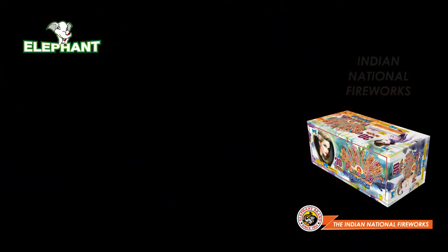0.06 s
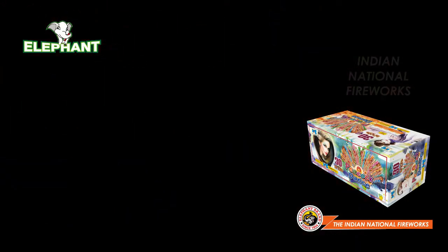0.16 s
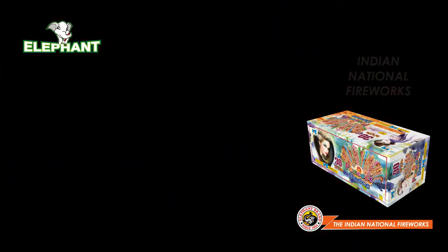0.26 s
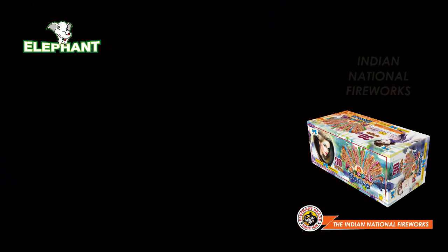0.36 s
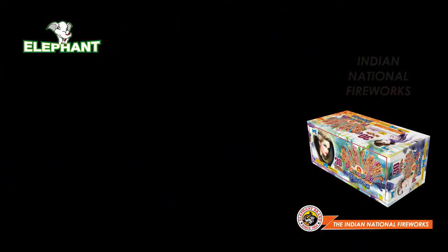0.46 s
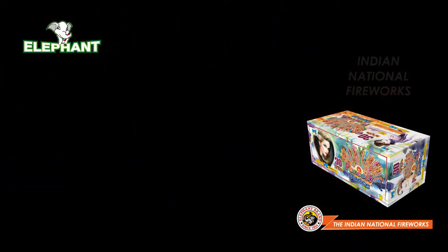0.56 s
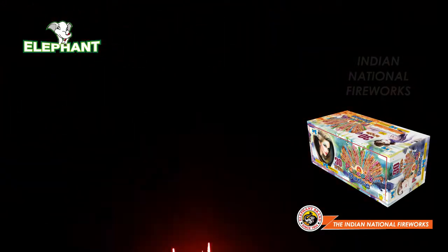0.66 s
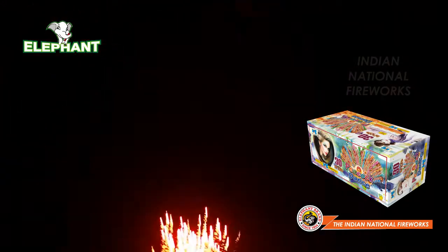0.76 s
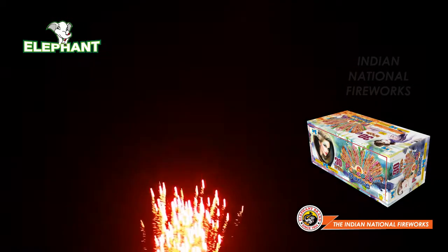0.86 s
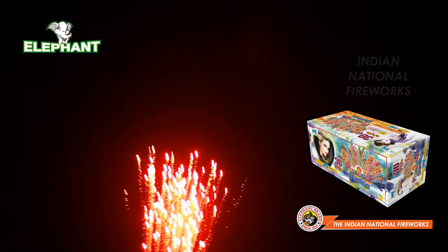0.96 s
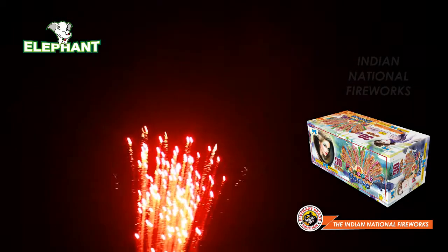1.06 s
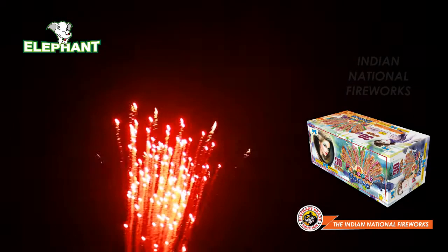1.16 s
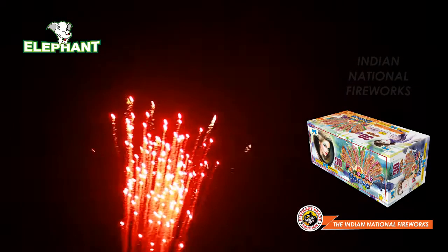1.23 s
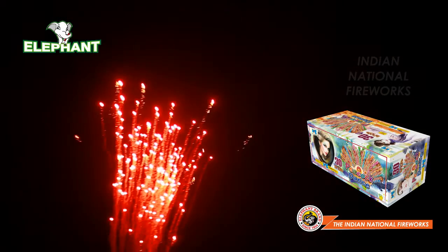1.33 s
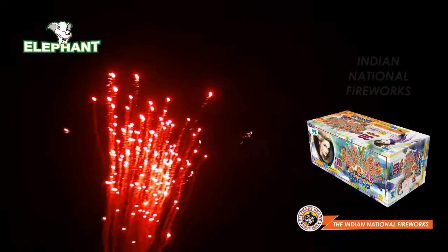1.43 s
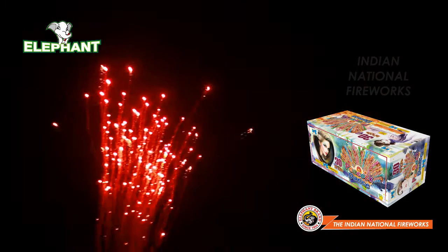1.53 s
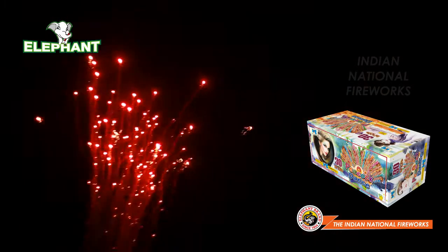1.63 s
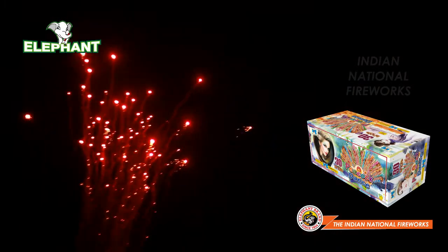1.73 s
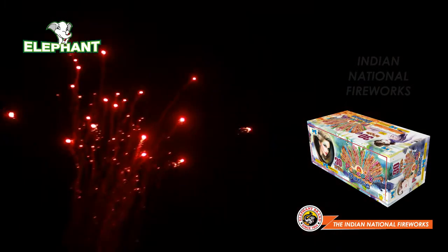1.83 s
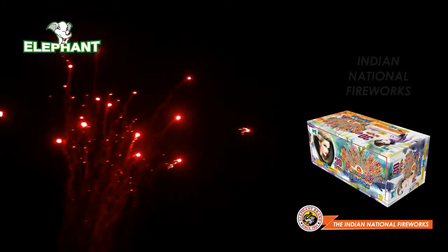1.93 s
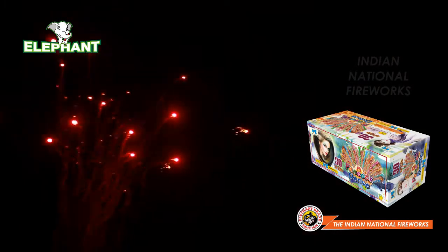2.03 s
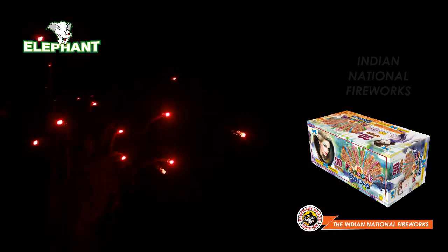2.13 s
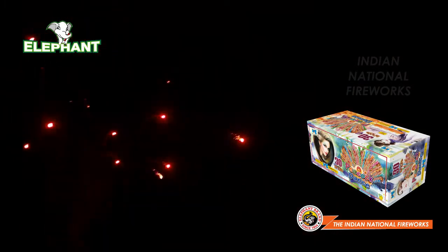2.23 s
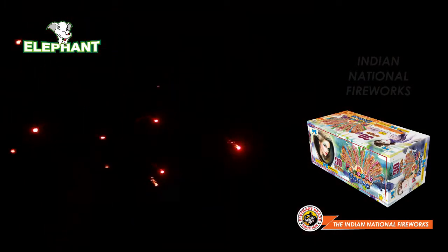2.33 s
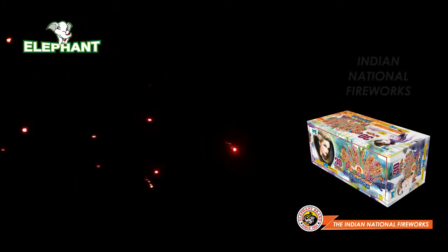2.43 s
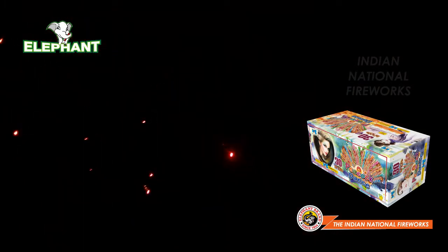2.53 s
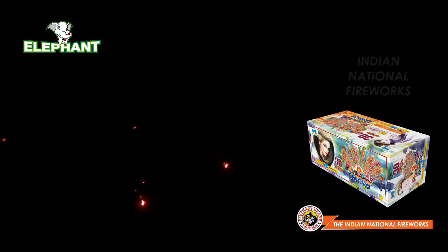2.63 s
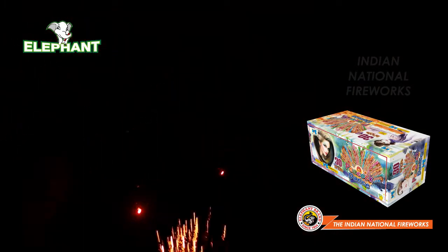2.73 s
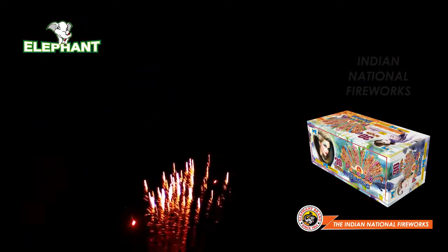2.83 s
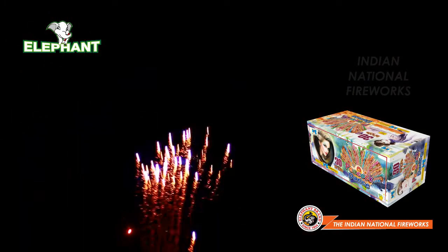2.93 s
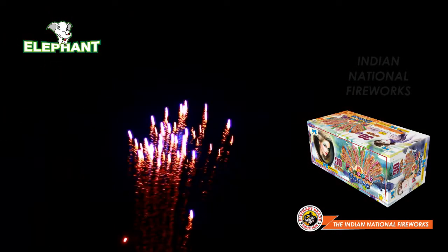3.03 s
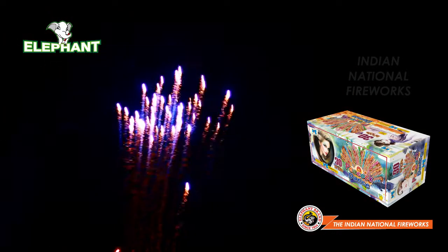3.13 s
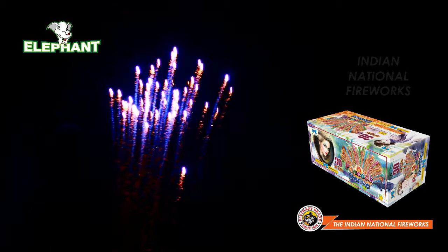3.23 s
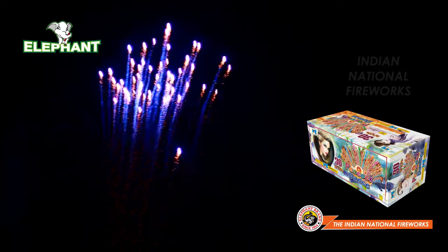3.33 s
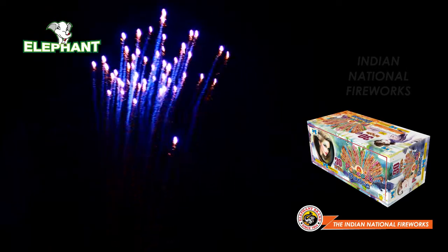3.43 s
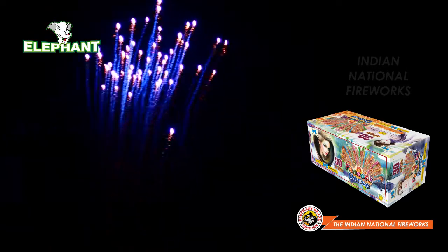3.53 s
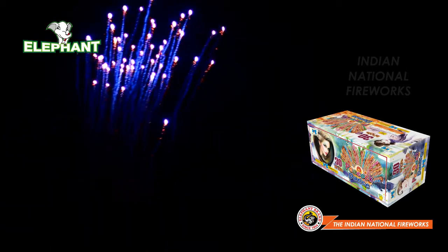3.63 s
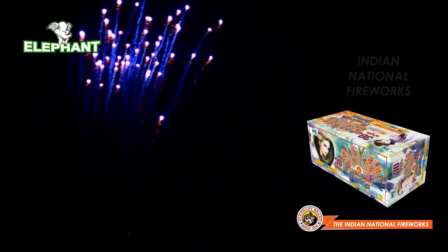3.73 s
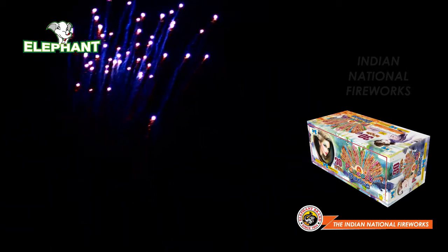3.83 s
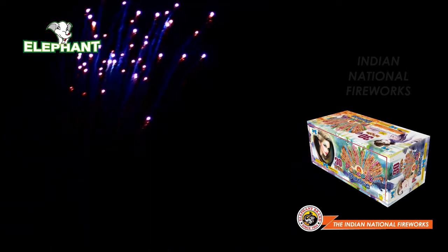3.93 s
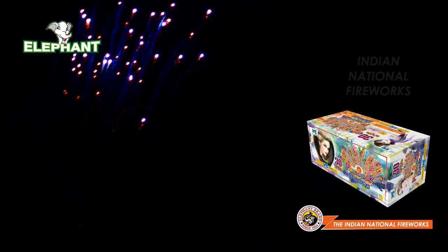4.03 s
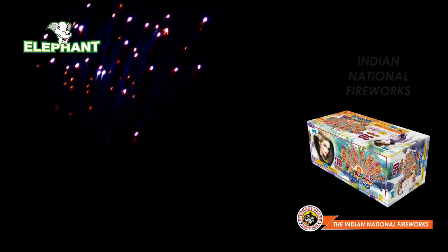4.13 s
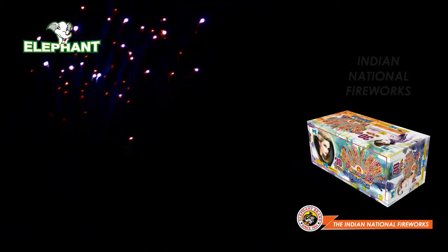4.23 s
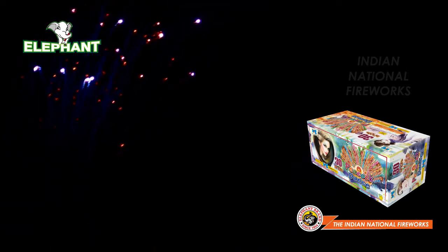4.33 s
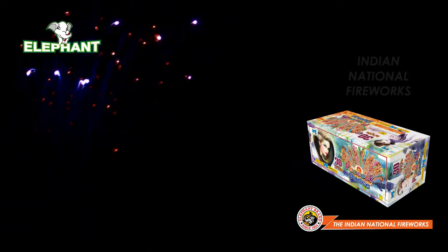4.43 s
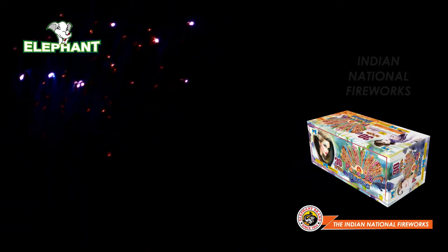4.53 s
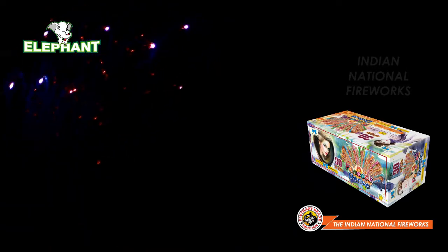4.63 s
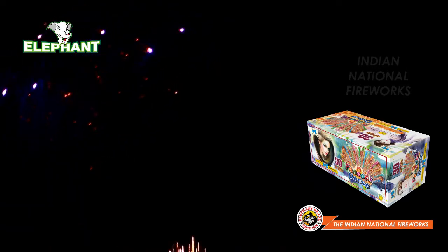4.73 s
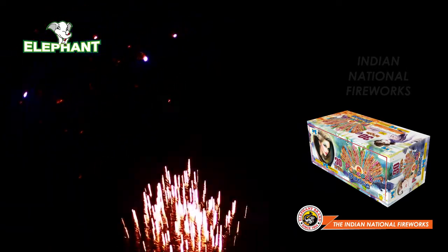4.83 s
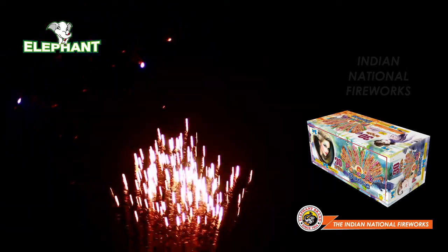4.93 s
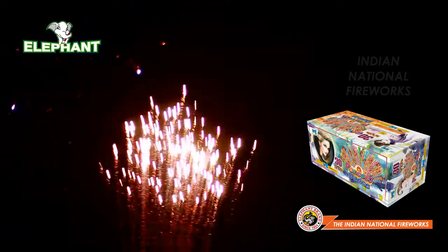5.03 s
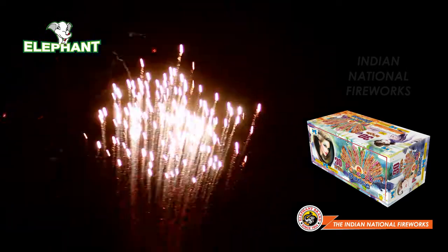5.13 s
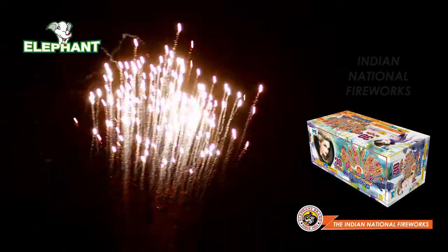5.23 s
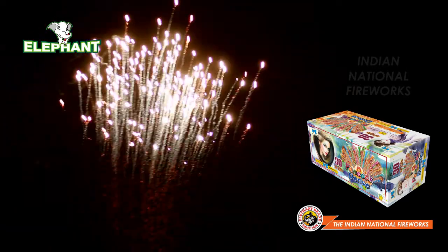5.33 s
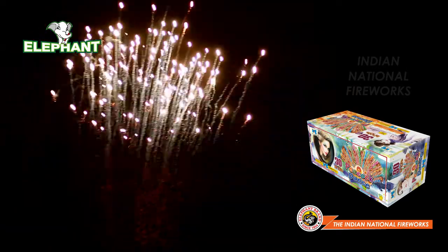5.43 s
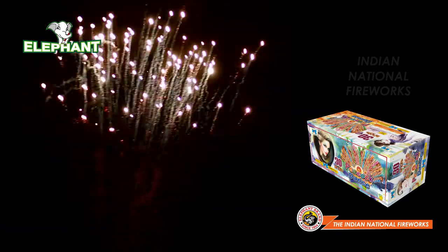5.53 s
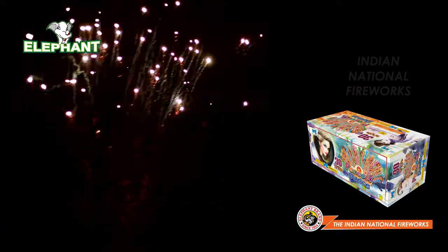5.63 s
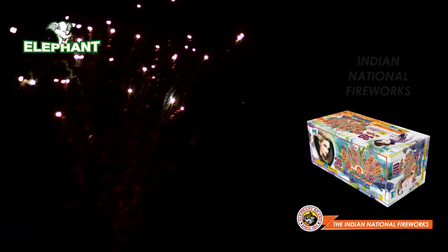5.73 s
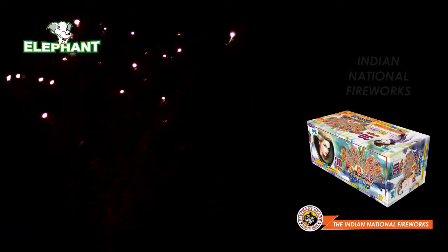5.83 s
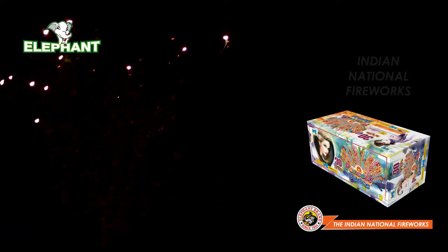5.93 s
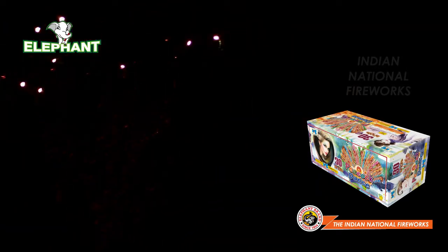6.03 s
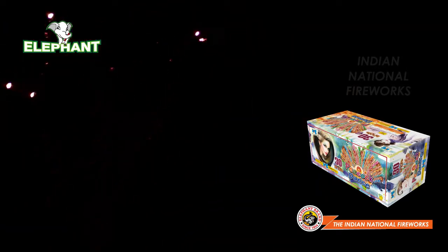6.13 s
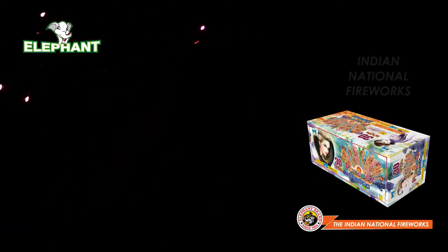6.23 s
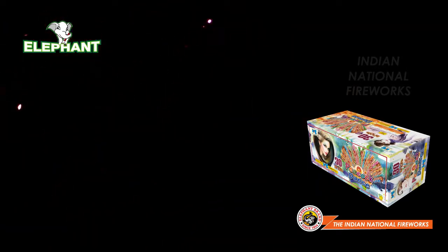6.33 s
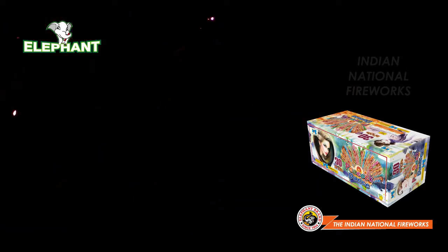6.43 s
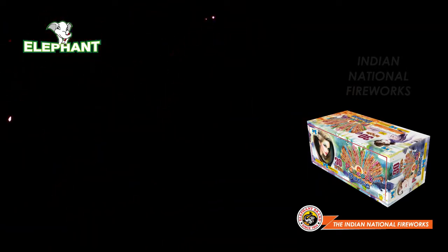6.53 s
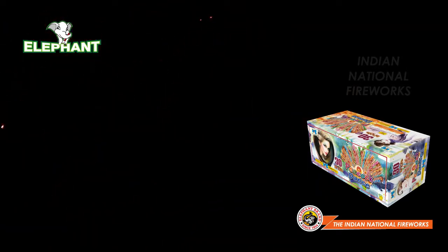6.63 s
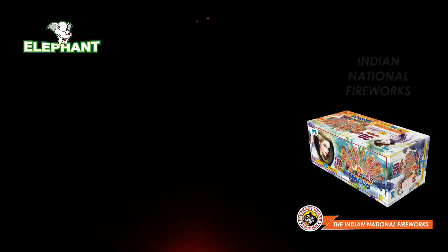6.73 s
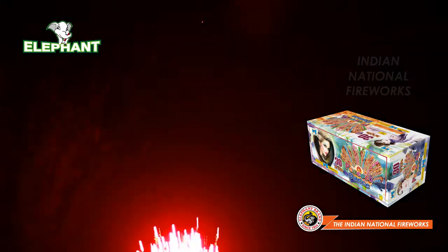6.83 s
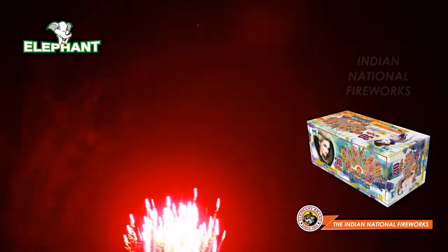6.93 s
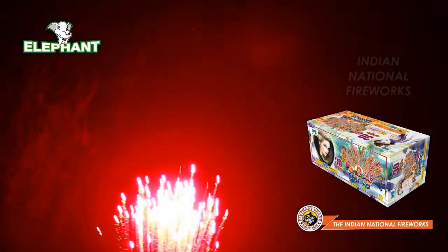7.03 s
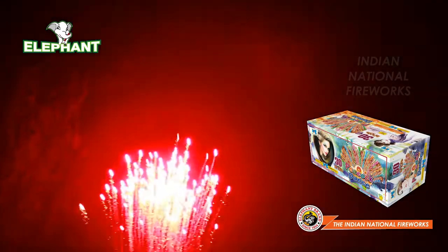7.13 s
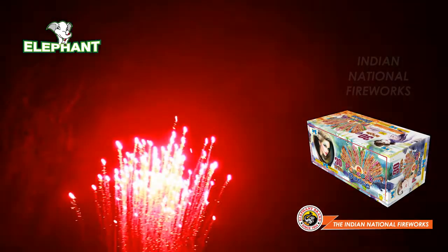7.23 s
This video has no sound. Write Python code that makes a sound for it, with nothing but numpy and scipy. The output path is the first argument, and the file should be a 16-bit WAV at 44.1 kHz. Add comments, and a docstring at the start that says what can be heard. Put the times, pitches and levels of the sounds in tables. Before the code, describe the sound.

In a cricket-filled field at night, a close fireworks cake cracks four times, overloading the microphone, burning stars hissing afterwards while far explosions thump.

```python
"""A fireworks cake fires four salvos of comets in a field at night, close enough to overload the microphone.
Each bang sums a noise crack, ringing tubes and box, a boom and a thump; a slap echo, scatter from ground
and trees, and a rolling tail follow it. Burning stars hiss as three bands of noise and pop in short bursts.
Other fireworks thud far off as damped low tones over a rumble. Crickets sing throughout as gliding tones,
and a katydid rasps once in a burst of noise."""
import sys
import numpy as np
from scipy import signal
from scipy.fft import rfft, irfft, next_fast_len
from scipy.io import wavfile

SR = 44100
rng = np.random.default_rng(int(sys.argv[2]) if len(sys.argv) > 2 else 0)


def log_audio(samples):
    """Write samples as a 16-bit WAV file to the path given in sys.argv[1]."""
    # one column per channel
    frames = np.atleast_2d(samples).T
    # limit to full scale, then quantise
    limited = np.clip(frames, -1, 1)
    pcm = np.round(limited * 32767).astype(np.int16)
    wavfile.write(sys.argv[1], SR, pcm)


N = 320607
TIME = np.arange(N) / SR  # s

# The salvos. Each row: start in seconds, crack level in dB, crack rise in seconds, tube pitch in Hz, tube level
# in dB, boom pitch in Hz, boom level in dB, boom delay in seconds, ground thump level in dB, echo delay in
# seconds, echo level in dB, relative scatter from ground and foliage in dB, rolling tail level in dB.
SALVOS = [(0.5402, -2.5, 0.0022, 641, 5.5, 309, 0.5, .0040, -4.5, 0.058, -19.5, 0, -29.5),
          (2.5214, -3, 0.0037, 905, 2.5, 285, 3.5, .0046, -9, 0.06, -18.5, -0.5, -25.5),
          (4.6532, 7.5, 0.0018, 1240, 5.5, 262.5, 15, 0.00316, -29, .0610, -17.5, 4.5, -18),
          (6.6300, 2, 0.0018, 647, 6.5, 234, 10, 0.0025, -11, 0.062, -18, -0.5, -21.5)]
# Hard surfaces near the cake. Each row: delay in seconds, level in dB.
BOUNCES = [(.0031, -13), (0.0103, -17.5), (0.0162, -22)]
# The cardboard box that holds the tubes, as resonances. Each row: pitch in Hz, relative level in dB.
BOX_MODES = [(380, -1), (500, 1.5), (650, -2), (890, -3), (1270, -3), (1540, -3.5), (2190, -3.5)]
# Spectra of the crack and of what ground, foliage and field return.
# Each row: frequency in Hz, relative density in dB per Hz.
CRACK_SPECTRUM = [(30, -0.5), (150, 3), (600, 1.5), (1400, -7), (2200, -8.5), (4000, -11.5), (9000, -15.5),
                  (16000, -27)]
GROUND_SPECTRUM = [(30, -10), (110, -5.5), (230, 1), (400, 3), (600, -3.5), (1000, -9), (2200, -21),
                   (5000, -25.5), (10000, -25.5), (16000, -43)]
FOLIAGE_SPECTRUM = [(100, -9), (350, 2.5), (1000, -5.5), (2000, -3), (3200, -2), (5000, -4), (9000, -8),
                    (12000, -16), (16000, -29.5)]
ROLL_SPECTRUM = [(30, -20.5), (100, -9.5), (270, 3.5), (430, -4), (800, -13), (2000, -17), (5000, -23),
                 (10000, -33.5), (16000, -43)]
GROUND_DB, FOLIAGE_DB = -14, -23  # before each salvo's own scatter level

# The burning stars of each salvo. Each row: catch in seconds, time to full flame in seconds, time at full flame
# in seconds, fade in dB per second, roar level at the catch in dB, hiss level in dB, fizz level in dB.
STARS = [(.6, 0.16, 0.41, 16.5, -45.5, -42.5, -45.5), (2.66, 0.53, 0.34, 18, -47, -57.5, -67.5),
         (4.85, 0.31, 0.33, 23.5, -45.5, -47, -53.5), (6.7, 0.25, .45, 22, -43, -43, -47.5)]
# Spectra of the three parts of the flame. Each row: frequency in Hz, relative density in dB per Hz.
ROAR_SPECTRUM = [(100, -20.5), (300, -4), (520, 0), (900, -1), (1300, -0.5), (2300, -3), (3500, -10),
                 (7000, -35.5)]
HISS_SPECTRUM = [(1200, -26.5), (2700, -3.5), (4000, -2.5), (6500, -2), (8500, -3.5), (11000, -18),
                 (16000, -33)]
FIZZ_SPECTRUM = [(6000, -27), (9000, -6.5), (10500, 0), (12500, -2), (15000, -7), (16500, -13)]
ROAR_SINK_DB_PER_S = 5  # the roar dies sooner than the hiss as the stars slow down

# Stars that pop overhead. Each row: start in seconds, relative level in dB, pitch of the ringing band in Hz,
# ring against snap in dB.
POPS = [(0.7008, -29.5, 2150, 3.5), (1.16, -28, 562, -8), (2.316, -49, 2240, 9.5), (3.114, -39, 1580, -2),
        (3.1450, -30, 1235, -0.5), (4.716, -19.5, 3150, 13.5), (4.7273, -19.5, 3130, 11),
        (4.8139, -26.5, 2480, 0), (5.1032, -31.5, 2660, -3), (5.2441, -29, 2730, -3),
        (5.2745, -20.5, 5300, -7.5)]
# Spectrum of their snap. Each row: frequency in Hz, relative density in dB per Hz.
POP_SPECTRUM = [(100, 2), (500, 4), (1400, -2.5), (3000, -1.5), (5500, -14), (7000, -16), (16000, -45)]

# Far fireworks. Each row: start in seconds, relative level in dB, pitch in Hz.
THUDS = [(0.107, -39, 139), (0.183, -29, 249), (0.22, -32, 150), (0.32, -28.5, 250), (0.378, -31.5, 148),
         (.451, -31, 195), (1.842, -36.5, 129), (1.99, -37.5, 150), (2.954, -32, 128), (2.978, -32.5, 129),
         (3.018, -27, 195), (4.471, -36.5, 147.4), (5.154, -29.5, 213), (5.456, -21.5, 148),
         (6.058, -24, 129), (6.099, -24.5, 170), (6.134, -22.5, 223), (6.189, -34, 169), (6.508, -21, 197),
         (6.566, -21, 150)]
# Underlying rumble, before reports add to it. Each row: time in seconds, level in dB.
RUMBLE_LEVEL = [(0, -54.5), (1.9, -60), (2.4, -62), (3.6, -64), (4.4, -55), (5.3, -45), (6.05, -43.5),
                (6.35, -52.5), (6.8, -36.5), (7.26, -43.5)]
# Spectra of the rumble and of the air. Each row: frequency in Hz, relative density in dB per Hz.
RUMBLE_SPECTRUM = [(15, -10), (40, -4), (80, 4.5), (140, 0.5), (260, -5), (450, -16), (900, -35.5),
                   (3000, -57.5)]
AIR_SPECTRUM = [(30, -0.5), (300, -1.5), (800, -4.5), (2000, -8), (5000, -13), (9000, -15), (12000, -19.5),
                (16000, -21)]
# The rumble that swells and dies after a listed thud or a salvo: level, and seconds to its peak.
THUD_RUMBLE_DB, THUD_RUMBLE_S = -22.5, .05  # dB relative to the thud's listed level
SALVO_RUMBLE_DB, SALVO_RUMBLE_S = -50, 0.15

# Two trilling crickets. Each row: wing strokes per second, mean start pitch in Hz, end pitch in Hz,
# stroke length in seconds, relative level in dB.
TRILLS = [(45.9, 9200, 7550, 0.0057, -56), (40.5, 8650, 6950, 0.0091, -56)]
# Gain of the trills and the chorus. Each row: time in seconds, gain in dB.
TRILL_EFFORT = [(0, 2.5), (2, 3), (3.4, 2.5), (4.3, 2.5), (6, 0.5), (6.6, 7.5)]
# A third cricket that chirps in pairs of strokes. Each row: start in seconds, level in dB.
CHIRPS = [(5.875, -55.5), (5.974, -52.5), (6.078, -50.5), (6.18, -48.5)]
# Spectrum of the katydid's rasp. Each row: frequency in Hz, relative density in dB per Hz.
RASP_SPECTRUM = [(3000, -71.5), (6100, -43.5), (6700, -13), (7400, -8.5), (8500, -1), (9700, -3),
                 (10800, -15), (12500, -24), (13500, -42), (16000, -59)]

EDGE_HZ = 15900  # upper band limit


def amp(db):
    """Decibels are logarithmic: 20 dB is a tenfold amplitude."""
    return 10 ** (np.asarray(db) / 20)


def evened(x):
    """Normalisation: scales to rms 1."""
    return x / np.sqrt(np.mean(x ** 2) + 1e-20)


def add(mix, s, sound):
    """Superposition: sums a sound into the mix at time s."""
    part = mix[max(round(s * SR), 0):][:len(sound)]
    part += sound[:len(part)]


def colour(x, points):
    """Spectral filtering: weights x by frequency, at rms 1."""
    hz, db = np.transpose(points)
    bins = np.fft.rfftfreq(len(x), 1 / SR)
    gain = amp(np.interp(np.log(bins + 1), np.log(hz), db))
    return evened(irfft(rfft(x) * gain, len(x)))


def noise(points, size=N):
    """Filtered Gaussian noise: white noise coloured at rms 1, then cut to size."""
    return colour(rng.standard_normal(next_fast_len(size)), points)[:size]


def scatter(points, size, grain_db=2.0):
    """Diffuse scattering: countless small contributions of unequal strength."""
    strength_db = grain_db * np.minimum(rng.exponential(1, size), 3)
    return colour(rng.standard_normal(size) * amp(strength_db), points)


def wander(per_s, size=N):
    """Slow random modulation: straight lines between per_s random knots a second, at rms 1."""
    knots = rng.standard_normal(size // 30)
    return evened(np.interp(np.arange(size) * per_s / SR, np.arange(len(knots)), knots))


def swell(t, peak_s):
    """Critically damped response: rises to 1 at peak_s, then dies away."""
    u = np.maximum(t, 0) / peak_s
    return u * np.exp(1 - u)


def ring(t, hz, peak_s):
    """Damped resonance of a struck body of air; push and suction cancel."""
    envelope = swell(t, peak_s)
    push = envelope * np.sin(2 * np.pi * hz * t)
    return push - envelope * push.sum() / envelope.sum()


def stroke(start_hz, end_hz, length):
    """Stridulation: the pitch falls as the scraper slows along the file."""
    hz = np.linspace(start_hz, end_hz, int(length * SR))
    phase = 2 * np.pi * np.cumsum(hz) / SR
    return np.sin(phase) * signal.windows.hann(len(hz)) ** .5


def trills():
    """Periodic stridulation: regular strokes, each slightly uneven in time, level and starting pitch."""
    out = np.zeros(N)
    for rate, start_hz, end_hz, length, db in TRILLS:
        for s in np.arange(0, TIME[-1], 1 / rate):
            late, loud, sharp = rng.standard_normal(3)
            sound = stroke(start_hz + 70 * sharp, end_hz, length)
            add(out, s + 0.00094 * late, amp(db + loud) * sound)
    return out


def katydid(level_db=-36, centre_s=3.877, rise_s=0.019, fall_s=0.022):
    """Stridulation as a noise burst: the wings scrape once, loud and near."""
    width = np.where(TIME < centre_s, rise_s, fall_s)
    shape = 1 / (1 + np.abs((TIME - centre_s) / width) ** 4)
    return amp(level_db) * noise(RASP_SPECTRUM) * amp(2.4 * wander(400)) * shape


def insects(chorus_db=-70):
    """Incoherent sum of many singers: two trills over a far chorus, paired chirps and one rasp."""
    chorus = noise([(5000, -40.5), (6800, -10.5), (7500, -1.5), (8400, -4.0), (9200, -14.0), (12000, -48)])
    out = amp(chorus_db) * chorus + trills()
    out *= amp(np.interp(TIME, *np.transpose(TRILL_EFFORT)))
    for s, db in CHIRPS:
        for gap in (0, .022):
            add(out, s + gap, amp(db) * stroke(5600, 4950, .015))
    return out + katydid()


def rumble(lumpy_db=3.0):
    """Incoherent sources add in power: a lumpy low rumble, fed by the listed thuds and the salvos."""
    power = amp(np.interp(TIME, *np.transpose(RUMBLE_LEVEL))) ** 2
    t = np.arange(SR) / SR
    for s, db, _ in THUDS:
        add(power, s, (amp(db + THUD_RUMBLE_DB) * swell(t, THUD_RUMBLE_S)) ** 2)
    for s, *_ in SALVOS:
        add(power, s, (amp(SALVO_RUMBLE_DB) * swell(t, SALVO_RUMBLE_S)) ** 2)
    return noise(RUMBLE_SPECTRUM) * np.sqrt(power) * amp(lumpy_db * np.tanh(wander(25)))


def thuds_everywhere(per_s=1.5, mean_db=-42, spread_db=3.5, pitch_hz=140):
    """Random independent events: the loud thuds, and fainter ones strewn among them."""
    chance = rng.random((60, 4))
    faint = []
    for s, loud, high, keep in chance:
        if keep < per_s * TIME[-1] / len(chance):  # leaves about per_s a second
            db = mean_db + spread_db * (2 * loud - 1)
            faint.append((s * TIME[-1], db, pitch_hz * 2 ** (high - .5)))
    return list(THUDS) + faint


def far_fireworks(thud_db=-1.0, smear=0.21, smear_s=0.022):
    """Distance acts as a low-pass filter: only dull thuds remain, each smeared by noise."""
    out, t = np.zeros(N), np.arange(SR // 10) / SR
    for s, db, hz in thuds_everywhere():
        low_smear = smear * noise(RUMBLE_SPECTRUM, size=len(t)) * swell(t, smear_s)
        knock = 0.076 * noise(GROUND_SPECTRUM, size=len(t)) * swell(t, 0.0021)
        thud = ring(t, hz, peak_s=0.48 / hz)
        add(out, s, amp(db + thud_db) * (thud + low_smear + knock))
    return out


def pops(level_db=-9):
    """Impulsive radiation: each small report is a broad snap and a ringing band under one short envelope."""
    out, t = np.zeros(N), np.arange(SR // 8) / SR
    for s, db, hz, ring_db in POPS:
        # the point order matters to the interpolation
        points = [(hz / 2, -40), (hz / 0.92, -12), (hz, 0), (hz * 0.9, -12), (hz * 2, -40), (SR, -70)]
        body = noise(points, size=len(t))
        snap = noise(POP_SPECTRUM, size=len(t))
        add(out, s, amp(db + level_db) * swell(t, 0.0037) * (snap + amp(ring_db) * body))
    return out


def stars(flutter_db=0.55):
    """Combustion noise: the comets catch, burn with a dense spitting hiss, and fade as they climb."""
    out, t = np.zeros(N), np.arange(3 * SR) / SR
    for s, rise_s, hold_s, fade_db_per_s, roar_db, hiss_db, fizz_db in STARS:
        faded_db = fade_db_per_s * np.maximum(t - rise_s - hold_s, 0)
        flutter = flutter_db * wander(90, size=len(t))
        burning = np.minimum(t / rise_s, 1) * amp(flutter - faded_db)
        sinking_db = roar_db - ROAR_SINK_DB_PER_S * t
        for spectrum, db in [(ROAR_SPECTRUM, sinking_db), (HISS_SPECTRUM, hiss_db), (FIZZ_SPECTRUM, fizz_db)]:
            add(out, s, burning * amp(db) * scatter(spectrum, size=len(t), grain_db=1.0))
    return out


def ground(t, t60=0.2, rise_s=0.002, patchy_db=2.0):
    """Diffuse reflection from the ground and things nearby, decaying 60 dB in t60 seconds."""
    level_db = -60 * t / t60 + patchy_db * wander(200, size=len(t))
    return scatter(GROUND_SPECTRUM, size=len(t)) * (1 - np.exp(-t / rise_s)) * amp(level_db)


def foliage(t, delay, rise_s=0.013, fall_s=0.033, patchy_db=2.5, second_path_s=.0032, second_path=0.18):
    """Scattering and comb filtering: leaves return a bright splash, made hollow by a second, longer path."""
    shape = np.exp(np.minimum((t - delay) / rise_s, (delay - t) / fall_s))  # peaks at delay
    patches = amp(patchy_db * wander(220, size=len(t)))
    splash = scatter(FOLIAGE_SPECTRUM, size=len(t), grain_db=3.0) * shape * patches
    return splash + second_path * np.interp(t - second_path_s, t, splash)


def roll(t, t60=0.79, far_s=0.264, far_width_s=0.041, far_db=5.5, patchy_db=2.0, count=4):
    """Reverberation: the bang rolls across the field and swells once off distant walls; bands flutter apart."""
    level_db = -60 * t / t60 + far_db * np.exp(-((t - far_s) / far_width_s) ** 2)
    spectrum = rfft(scatter(ROLL_SPECTRUM, size=len(t)))
    band = np.searchsorted([500, 1500, 4000], np.fft.rfftfreq(len(t), 1 / SR))  # edges in Hz
    rolling = np.zeros(len(t))
    for k in range(count):
        flutter = amp(patchy_db * wander(150, size=len(t)))
        rolling += irfft(spectrum * (band == k), len(t)) * flutter
    return rolling * (1 - np.exp(-t / 0.051)) * amp(level_db)


def blast(t, crack_db, crack_s, tube_hz, tube_db, boom_hz, boom_db, boom_s, thump_db, box_db=-7, ragged_db=-2.0):
    """Explosive radiation: gas tears out, tubes and box ring, the expanding cloud booms, the recoil thumps."""
    ragged = amp(crack_db + ragged_db * wander(720, size=len(t)))
    crack = ragged * noise(CRACK_SPECTRUM, size=len(t)) * swell(t, crack_s) ** 2
    bounced = sum(amp(db) * np.interp(t - late, t, crack) for late, db in BOUNCES)
    tubes = amp(tube_db) * ring(t - .0005, tube_hz, peak_s=0.0022)
    box = sum(amp(box_db + db) * ring(t - .001, hz, peak_s=0.0025) for hz, db in BOX_MODES)
    boom = amp(boom_db) * ring(t - boom_s, boom_hz, peak_s=0.0015)
    thump = amp(thump_db) * ring(t - .001, 110, peak_s=0.0027)
    return crack + bounced + tubes + box + boom + thump


def salvos():
    """Direct sound, early reflection and reverberation: each blast with its slap echo, scatter and tail."""
    out, t = np.zeros(N), np.arange(SR * 4 // 5) / SR
    brief, near = t[:SR // 20], t[:SR // 3]
    for s, *charge, delay, echo_db, scatter_db, tail_db in SALVOS:
        bang = blast(brief, *charge)
        add(out, s, bang)
        add(out, s + delay, amp(echo_db) * bang)
        scattered = amp(GROUND_DB) * ground(near) + amp(FOLIAGE_DB) * foliage(near, delay + 0.002)
        add(out, s, amp(scatter_db) * scattered)
        add(out, s, amp(tail_db) * roll(t))
    return out


def scene(air_db=-58):
    """Linear superposition of every source over the steady noise of the night air."""
    air = amp(air_db) * noise(AIR_SPECTRUM)
    background = air + insects() + rumble() + far_fireworks()
    return (background + pops() + stars() + salvos())[None]


def record(dry, low_hz=30):
    """Overload distortion: the microphone sheds the deepest bass, blasts clip flat; then the band limit."""
    heard = signal.lfilter(*signal.butter(1, low_hz, "high", fs=SR), dry)
    clipped = np.clip(heard, -1, 1)
    band_limit = signal.firwin(511, EDGE_HZ, window=("kaiser", 7), fs=SR)
    return signal.oaconvolve(clipped, band_limit[None], "same")


dry = scene()
out = record(dry)
log_audio(out)
```